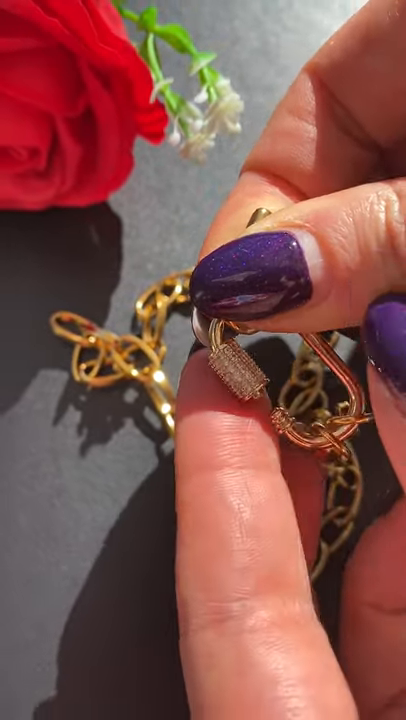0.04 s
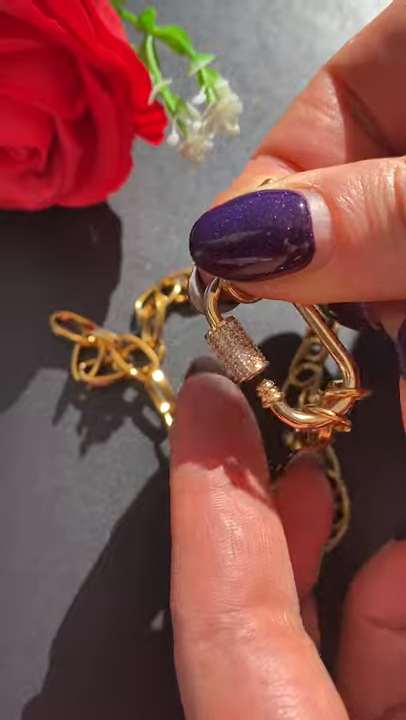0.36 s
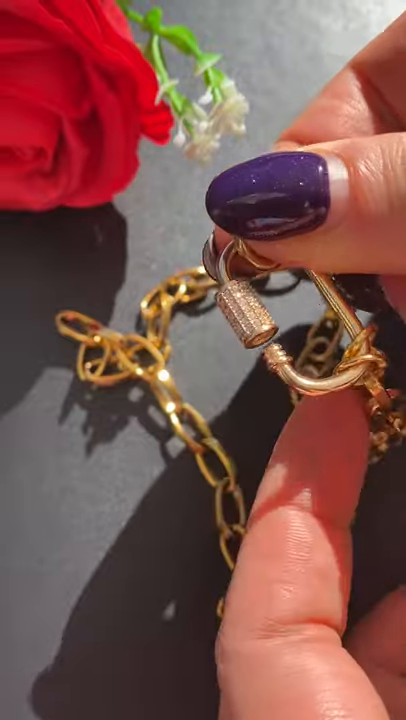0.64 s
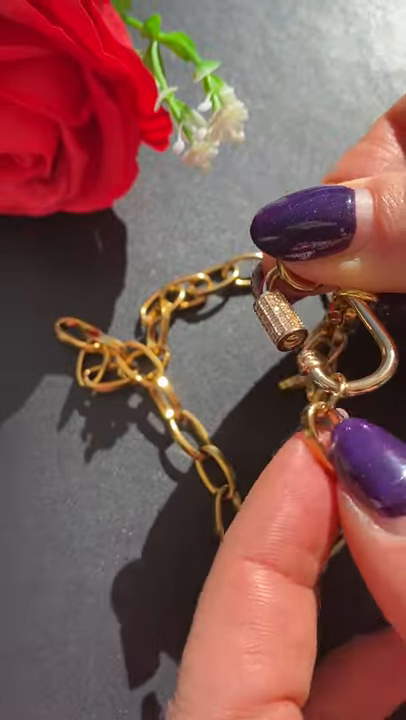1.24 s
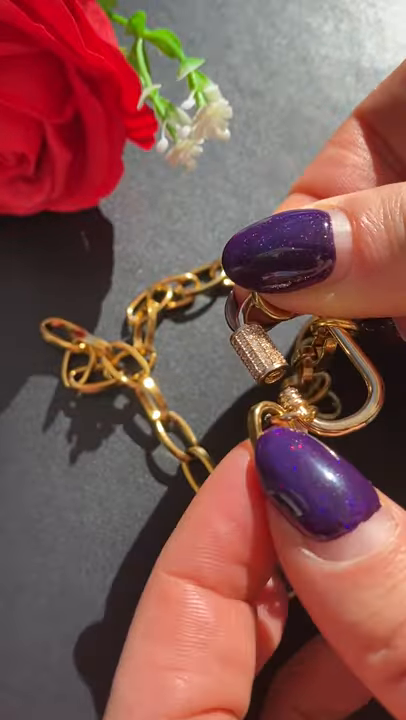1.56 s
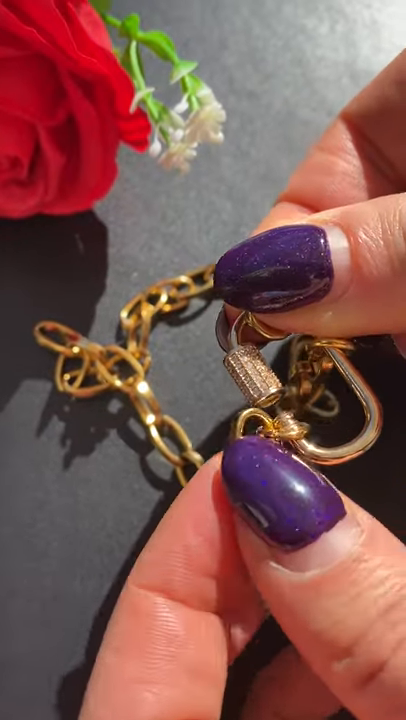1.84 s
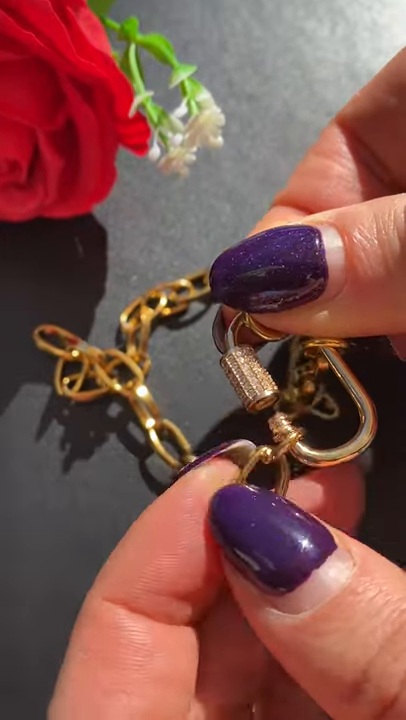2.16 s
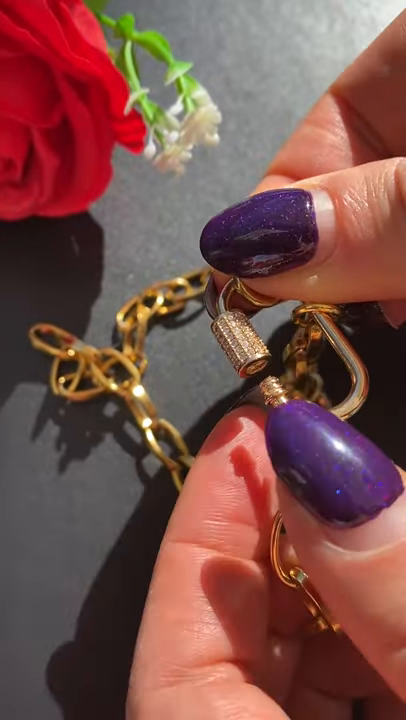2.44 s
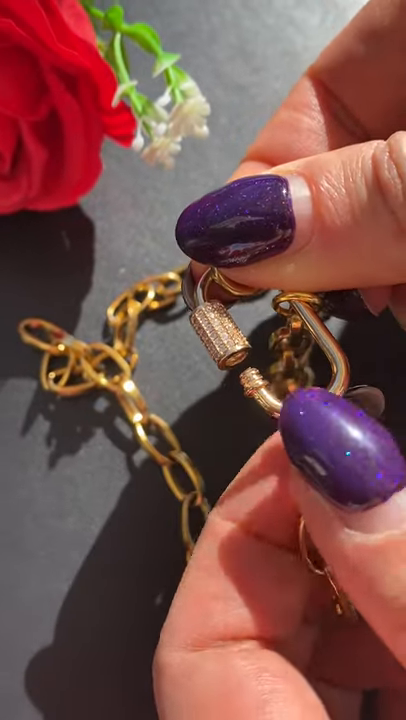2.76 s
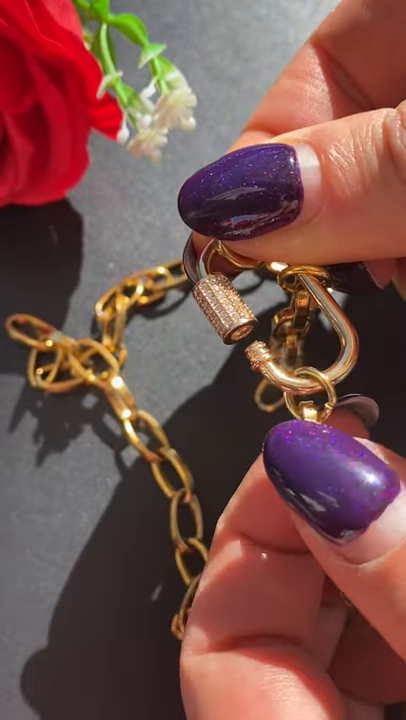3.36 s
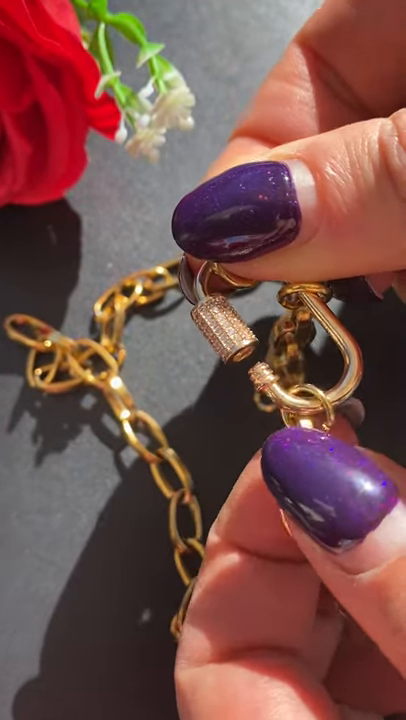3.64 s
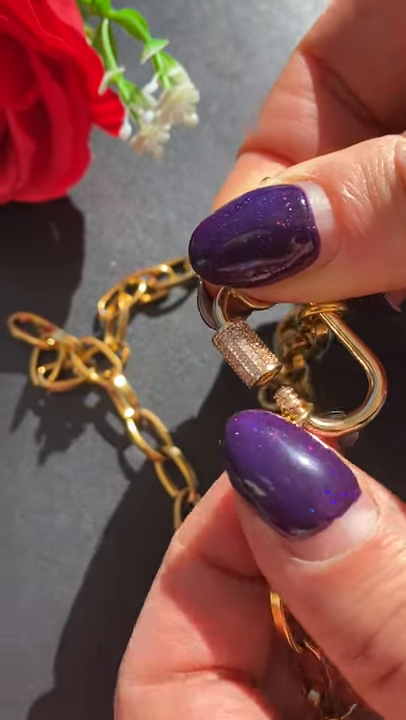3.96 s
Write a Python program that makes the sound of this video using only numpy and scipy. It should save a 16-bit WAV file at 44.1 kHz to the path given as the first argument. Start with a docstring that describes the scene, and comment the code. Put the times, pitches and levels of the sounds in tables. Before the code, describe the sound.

A small metal chain ticks and rustles as fingers thread it onto a clasp, tapping dully on a board beneath. The clicks cluster early, then thin out, heard close up in a quiet room with a low hum.

```python
"""A small metal chain is threaded onto an open clasp, close up in a quiet room.
Its links tick and ring very high as they strike, and rustle as they slide over each other.
The hanging chain taps the thin board beneath, and the skin of the fingers brushes past.
Behind it sit a low, wavering machine hum and soft room air; a distant rush swells at the end."""
import sys
import numpy as np
from scipy import signal
from scipy.fft import rfft, irfft, next_fast_len
from scipy.io import wavfile
from scipy.ndimage import uniform_filter1d, map_coordinates

SR = 44100
rng = np.random.default_rng(int(sys.argv[2]) if len(sys.argv) > 2 else 0)


def waveform_to_disk(signal):
    """Save audio, clipped to [-1, 1], as 16-bit WAV at the path in sys.argv[1]."""
    frames = np.transpose(np.atleast_2d(signal))
    scaled = np.clip(frames, -1, 1) * 32767
    samples = np.round(scaled).astype(np.int16)
    wavfile.write(sys.argv[1], SR, samples)


N = 176400

# The ring of a link. Each row: pitch in Hz, relative level in dB, T60 in seconds.
LINK_MODES = [(4650, -22.5, 0.083), (5850, -17.5, 0.028), (7860, -13, 0.023), (11300, -21, 0.019),
              (14160, 0.5, .034), (14170, -1.5, 0.053), (14400, -19, 0.032)]
# A link hits a link or the clasp. Each row: time in seconds, relative tick level in dB,
# tick pitch in Hz, relative ring level in dB.
CLINKS = [(0.121, -55.5, 8800.0, -74), (0.1456, -67, 12000.0, -74), (0.1737, -64, 8600, -67),
          (0.2749, -64, 3600.0, -93), (0.499, -51, 12500, -62), (0.537, -63, 7700.0, -59),
          (0.5836, -56.5, 8900, -54), (0.6037, -76, 12700.0, -70), (0.6207, -55.5, 8200.0, -50),
          (0.6251, -40.5, 7960, -54), (0.6963, -53.5, 10600, -72), (0.7216, -53, 15000, -62),
          (0.7367, -53.5, 4370, -60), (0.7776, -54.5, 14700, -71), (0.837, -63, 10800.0, -59),
          (0.8622, -56, 15100, -49), (0.8665, -50, 11400, -65), (0.9054, -41, 8500, -43),
          (0.9099, -38, 5570, -49), (0.917, -44, 11100.0, -46), (0.942, -50, 12800.0, -41),
          (0.9659, -38.5, 11100, -61), (0.9753, -52, 7900.0, -32), (0.9856, -41, 7900.0, -44),
          (0.996, -54, 12800.0, -53), (1.022, -44, 8100.0, -50), (1.0305, -50, 7460, -47),
          (1.0564, -41.5, 8500, -55), (1.0584, -48, 9400, -57), (1.0674, -44, 7900.0, -53),
          (1.095, -58, 10900.0, -57), (1.1493, -52, 11400, -58), (1.2241, -53, 12400, -58),
          (1.287, -54, 15000, -61), (1.3462, -58, 8050, -78), (1.3837, -59, 12000.0, -58),
          (1.4424, -55.5, 11900, -67), (1.4506, -54.5, 8100.0, -63), (1.4907, -58.5, 8050, -53),
          (1.5103, -52, 11200, -73), (1.5246, -52, 7850, -72), (1.552, -56.5, 8100.0, -52),
          (1.832, -45.5, 13500, -59), (1.8522, -47.5, 12800.0, -74), (2.0213, -54, 5900.0, -78),
          (2.0516, -51, 6650, -78), (2.0893, -46.5, 8800, -66), (2.103, -46, 10500, -55),
          (2.1205, -47.5, 4600, -65), (2.13, -65, 8200.0, -55), (2.1864, -45.5, 10700, -55),
          (2.2111, -61, 8400.0, -56), (2.2255, -42, 13200, -49), (2.3282, -65.5, 10000, -76),
          (2.4484, -68, 9700, -93), (2.4763, -68, 8100.0, -67), (2.5075, -61.5, 11000, -57),
          (2.5427, -59.5, 10600, -64), (2.6611, -70.5, 8700.0, -92), (2.7444, -72, 9600.0, -77),
          (2.8204, -62.5, 10900, -77), (3.039, -63, 7900.0, -74), (3.0898, -60.5, 4770, -57),
          (3.2465, -67.5, 4500.0, -66), (3.3994, -57.5, 7500.0, -89), (3.695, -57, 10300, -62),
          (3.7234, -55, 13000, -79), (3.756, -58.5, 8200, -79), (3.7891, -54.5, 12300, -74)]
def link_clinks(tick_trim_db=-1, ring_trim_db=4, lead_s=.01):
    """Each contact is a graze, a hard tick, a brief chatter and a ring that the fingers damp."""
    graze_s, tick_s, chatter_s, ring_attack_s = .0014, .0006, .007, .001
    out, t = np.zeros(N), np.arange(SR // 7) / SR - lead_s
    after = np.maximum(t, 0)
    graze = amp(-15.5) * np.exp(-abs(t) / graze_s)
    strike = np.exp(-after / tick_s) + amp(-17) * np.exp(-after / chatter_s)
    envelope = np.where(t < 0, graze, strike)
    for s, tick_db, pitch_hz, ring_db in CLINKS:
        tick = burst(metal_contact(envelope * rng.standard_normal(len(t)), pitch_hz), size=44)
        tone = ring(LINK_MODES, after, detune=.009) * (1 - np.exp(-after / ring_attack_s))
        add(out, s - lead_s, amp(tick_db + tick_trim_db) * tick + amp(ring_db + ring_trim_db) * tone)
    return out


# The bright EQ of a tick. Each row: frequency in Hz, relative gain in dB.
TICK_EQ = [(600, -40), (2000, 6.5), (4000, -1), (7500, 6), (15200, 7.5), (16400, -9)]
def metal_contact(x, pitch_hz, peak_db=11.5, half_width_hz=750):
    """Metal on metal, with a broad peak whose pitch depends on where the links touch."""
    peak = lambda hz: 1 / (1 + ((hz - pitch_hz) / half_width_hz) ** 2)
    return filtered(x, lambda hz: amp(along(TICK_EQ, hz) + peak_db * (peak(hz) - .5)))


# Links slide over each other. Each row: start in seconds, length in seconds, relative level in dB.
RUSTLES = [(0.049, 0.14, -73), (0.498, 0.28, -67.5), (0.9, 0.14, -52.5), (1.067, 0.13, -66),
           (1.242, .31, -71.5), (2.012, 0.23, -63.5), (2.812, 0.032, -76), (3.061, 0.083, -70),
           (3.667, 0.13, -70)]
def link_rustle(links=8, grains_per_s=1800, attack_s=.037, settle_s=.025):
    """Sliding links make a spray of tiny contacts; each link in play rings a little differently."""
    t, level, out = np.arange(N) / SR, np.zeros(N), np.zeros(N)
    for s, length, db in RUSTLES:
        attack = np.clip((t - s) / attack_s + .5, 0, 1)
        level += amp(db) * attack * np.exp(-np.maximum(t - s - length, 0) / settle_s)
    level *= unit(amp(4.5 * wobble(70)))  # the links catch and slip
    for pitch_hz in np.linspace(4500, 15000, links):
        sizes = amp(-3 * np.clip(rng.standard_normal(N), -2, 2)) * rng.choice([-1, 1], N)
        hits = rng.random(N) < grains_per_s / links / SR
        grains = level * unit(hits * sizes)
        tone = ring(LINK_MODES, t[:SR // 10], detune=.0052)
        shimmer = signal.fftconvolve(grains, tone / np.linalg.norm(tone))[:N]
        out += metal_contact(grains, pitch_hz) + amp(-5) * shimmer
    return amp(-4.5) * out / np.sqrt(links)


# The dull body of the board. Each row: frequency in Hz, relative gain in dB.
BOARD_EQ = [(70, 6), (210, 16), (380, 1.5), (1050, 4.5), (1600, -5.5), (2450, -12), (3300, -28)]
# Its resonances. Each row: pitch in Hz, relative level in dB, T60 in seconds.
BOARD_MODES = [(178.5, -6.5, 0.11), (547, -8, 0.12), (984, -5, 0.031)]
# The chain lands on the board. Each row: time in seconds, relative level in dB.
TAPS = [(0.621, -53), (0.645, -53), (0.752, -52), (0.93, -46.5), (0.9658, -39), (0.9875, -39.5),
        (1.021, -49), (1.0317, -45), (1.0549, -49), (1.0592, -40.5), (1.092, -49), (1.148, -49.5),
        (1.511, -48.5), (1.52, -52.5), (2.329, -60.5), (2.449, -55), (2.544, -51), (2.82, -58.5),
        (3.691, -56)]
def board_taps(trim_db=4.5, tail_t60_s=.072, width=.25):
    """Bending waves carry the highs through the board first, so each tap chirps down, then rings."""
    travel_s = .002158  # for a 1 kHz bending wave
    out, t = np.zeros((2, N)), np.arange(SR // 6) / SR
    bend = lambda hz: amp(along(BOARD_EQ, hz)) * np.exp(-4j * np.pi * travel_s * np.sqrt(hz * 1000))
    chirp = filtered(signal.unit_impulse(len(t)), bend)
    attack = 1 - np.exp(-t / travel_s)
    for s, db in TAPS:
        noise = rng.standard_normal(len(t)) + width * rng.standard_normal((2, len(t)))
        tail = coloured(noise * amp(-60 * t / tail_t60_s) * attack, BOARD_EQ)
        tap = burst(unit(chirp) + amp(1) * unit(tail), size=220)
        body = ring(BOARD_MODES, t, detune=.0037) * attack
        add(out, s - travel_s / 2, amp(db + trim_db) * burst(tap + body, size=220))
    return out


# The broad hiss of skin. Each row: frequency in Hz, relative gain in dB.
SKIN_EQ = [(400, -6), (2000, 3.5), (11000, 2.5), (16400, -3)]
# Finger strokes. Each row: peak time in seconds, rise in seconds, fall in dB per second, level in dB.
BRUSHES = [(1.674, 0.015, 203, -57.5), (1.99, 0.079, 122, -74.5)]
def skin_brushes():
    """Skin slides by: a smooth hiss that rises and fades."""
    t, level = np.arange(N) / SR, np.zeros(N)
    for s, rise, fall, db in BRUSHES:
        level += amp(db - fall * np.maximum(t - s, 0)) * np.clip(1 + (t - s) / rise, 0, 1)
    return level * unit(coloured(rng.standard_normal(N), SKIN_EQ))


# Where the hands sit in stereo. Each row: frequency in Hz, phase lead of the left side in radians.
LEFT_LEAD = [(2000, 1.5), (5300, 0.13), (6700, 3), (8300, 4), (15400, 11)]
def hands_in_room(x, reverb_db=-23, t60_s=.29):
    """The hands are a little nearer the left side; the room adds a short tail."""
    t = np.arange(SR // 3) / SR
    tail = rng.standard_normal((2, len(t))) * amp(-60 * t / t60_s)
    reverb = signal.fftconvolve(x[None], tail / np.linalg.norm(tail[0]), axes=1)[:, :N]
    direct = filtered(x, lambda hz: np.exp(.5j * along(LEFT_LEAD, hz) * np.array([[1], [-1]])))
    return direct + amp(reverb_db) * reverb


# Fader rides for the hum and its octave. Each row: time in seconds, relative level in dB.
HUM_RIDE = [(0.25, -63), (0.42, -46.5), (0.93, -58), (1.53, -50), (2.22, -51), (2.55, -48.5), (3.06, -46),
            (3.51, -56), (3.72, -42.5)]
OCTAVE_RIDE = [(0.0, -55.5), (1.8, -46.5), (2.52, -62.5), (3.99, -52)]
def machine_hum(pitch_hz=48.13, drift_rad=.66):
    """A machine drones on a low note and its octave, each wavering in level and phase."""
    phase = 2 * np.pi * pitch_hz * np.arange(N) / SR
    low = amp(curve(HUM_RIDE) - .5) * np.sin(phase + drift_rad * wobble(5.05))
    octave = amp(curve(OCTAVE_RIDE) - 2.5) * np.sin(2 * phase + drift_rad * wobble(5))
    return np.sqrt(2) * (low + octave)


# EQs for the rumble, the air and the distant rush. Each row: frequency in Hz, relative gain in dB.
RUMBLE_EQ = [(28, -40.5), (46, 3.5), (85, 2.5), (170, -7), (250, -17.5), (600, -94)]
AIR_EQ = [(30, -33.5), (170, 1.5), (950, -0.5), (1450, -8.5), (3200, -27.5), (6000, -39), (11500, -43),
          (14000, -54)]
RUSH_EQ = [(200, -35), (750, 5), (1200, -11), (4000, -72)]
# Fader ride for the rush. Each row: time in seconds, level in dB.
RUSH_RIDE = [(3.2, -80), (3.6, -63.5), (4, -58)]
def room_tone():
    """A bed of low rumble and soft air, with a distant rush that swells at the end."""
    bed = amp(-50) * room_noise(RUMBLE_EQ) + amp(-59) * room_noise(AIR_EQ)
    return bed + amp(curve(RUSH_RIDE)) * room_noise(RUSH_EQ)


# The stereo image of the room. Each row: frequency in Hz, left-right correlation.
ROOM_CORRELATION = [(140, 0.99), (260, 0.94), (550, 0.21)]
def room_noise(eq):
    """Stereo noise of rms 1, near mono in the bass and wide above."""
    def mid_side_gains(hz):
        angle = np.arccos(along(ROOM_CORRELATION, hz)) / 2
        return amp(along(eq, hz)) * [np.cos(angle), np.sin(angle)]
    mid, side = filtered(rng.standard_normal((2, N)), mid_side_gains)
    return unit(np.array([mid + side, mid - side]))


def ring(modes, t, detune):
    """Damped modes; every contact detunes them anew and shifts the balance between them."""
    hz, db, t60 = np.transpose(modes)[:, :, None]
    balance, tuning, phase = rng.standard_normal((3, len(modes), 1))
    gain = amp(db + 3 * balance)
    gain *= np.linalg.norm(amp(db)) / np.linalg.norm(gain)
    partials = np.sin(2 * np.pi * (hz * (1 + detune * tuning) * t + phase))
    return np.sum(gain * amp(-60 * t / t60) * partials, axis=0)


def amp(db):
    """Decibels to gain."""
    return 10 ** (np.asarray(db) / 20)


def unit(x):
    """Scale to rms 1."""
    return x / np.sqrt(np.mean(x ** 2) + 1e-20)


def burst(x, size):
    """Scale so that the loudest stretch of size samples has rms 1."""
    return x / np.sqrt(uniform_filter1d(x ** 2, size, axis=-1, mode="constant").max())


def along(points, hz):
    """Read (Hz, value) points on a log axis."""
    f, v = np.transpose(points)
    return np.interp(np.log(hz + 1), np.log(f + 1), v)


def curve(rows):
    """Join (seconds, value) points, one value per sample."""
    return np.interp(np.arange(N) / SR, *np.transpose(rows))


def wobble(rate):
    """A smooth random curve, rate knots a second."""
    return map_coordinates(rng.standard_normal(int(N * rate / SR) + 4), [np.arange(N) * rate / SR])


def filtered(x, response):
    """Apply a complex frequency response."""
    n = x.shape[-1]
    padded = next_fast_len(n + 8192)
    return irfft(rfft(x, padded) * response(np.fft.rfftfreq(padded, 1 / SR)), padded)[..., :n]


def coloured(x, eq):
    """Apply an EQ of (Hz, dB) points."""
    return filtered(x, lambda hz: amp(along(eq, hz)))


def add(track, s, sound):
    """Mix a sound into the track at s seconds."""
    part = track[..., max(round(s * SR), 0):][..., :sound.shape[-1]]
    part += sound[..., :part.shape[-1]]


def scene():
    """Chain, fingers and board up front; hum and room tone behind."""
    hands = hands_in_room(link_clinks() + link_rustle() + skin_brushes())
    return hands + board_taps() + machine_hum() + room_tone()


def record(dry, fade_s=.008, top_hz=16150):
    """Short fades at both ends and a brick-wall high cut."""
    t = np.arange(N) / SR
    fade = np.clip(np.minimum(t, t[-1] - t) / fade_s, 0, 1)
    return filtered(dry * fade, lambda hz: hz < top_hz)


dry = scene()
out = record(dry)
waveform_to_disk(out)
```